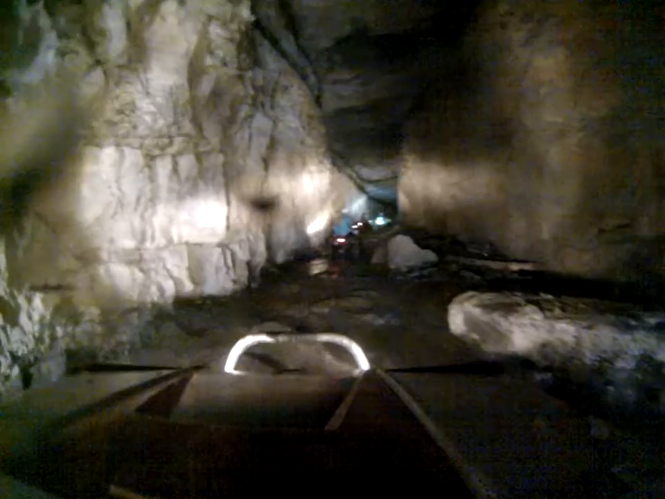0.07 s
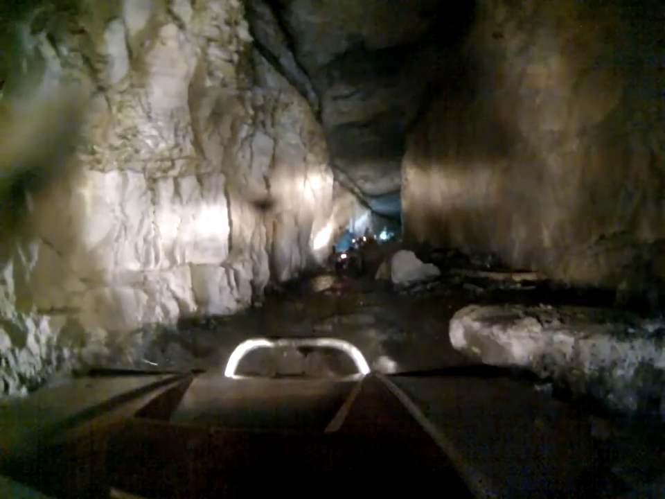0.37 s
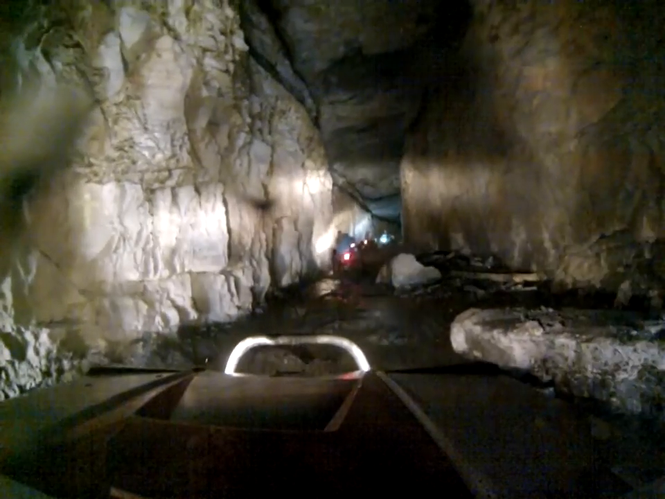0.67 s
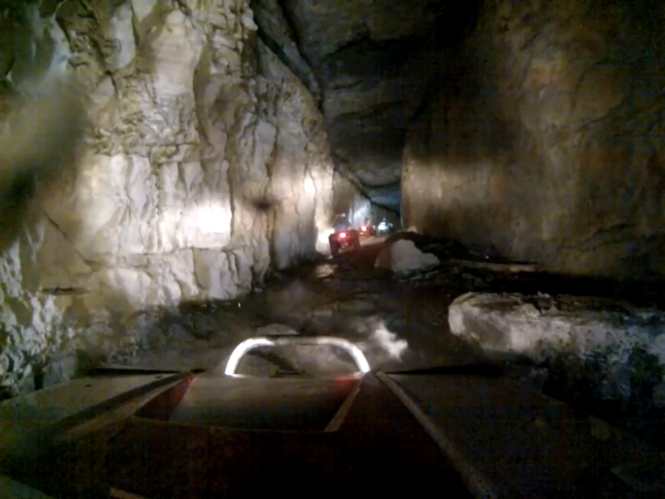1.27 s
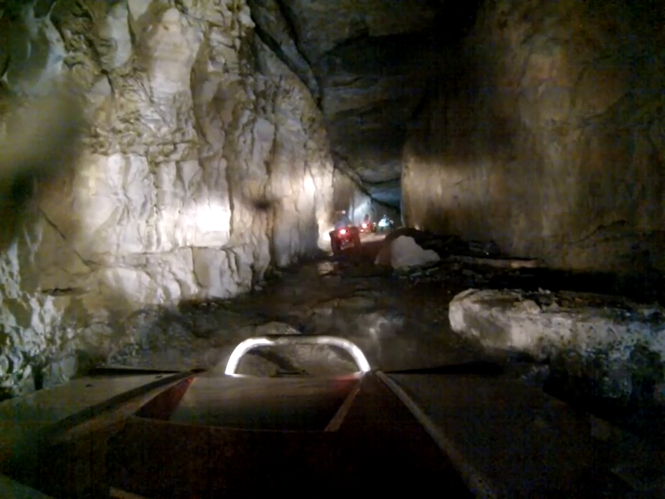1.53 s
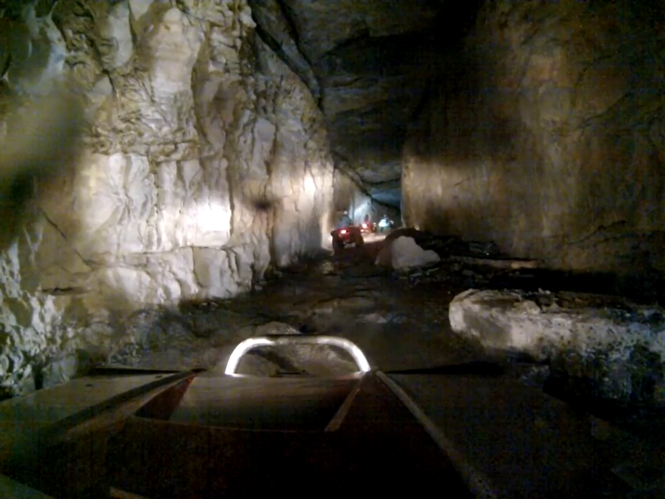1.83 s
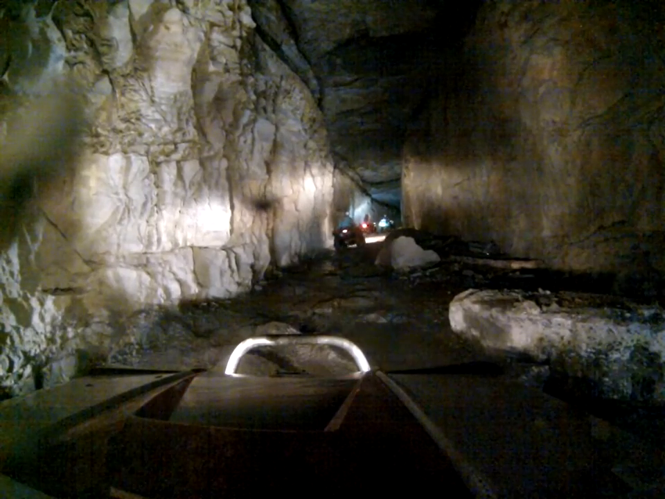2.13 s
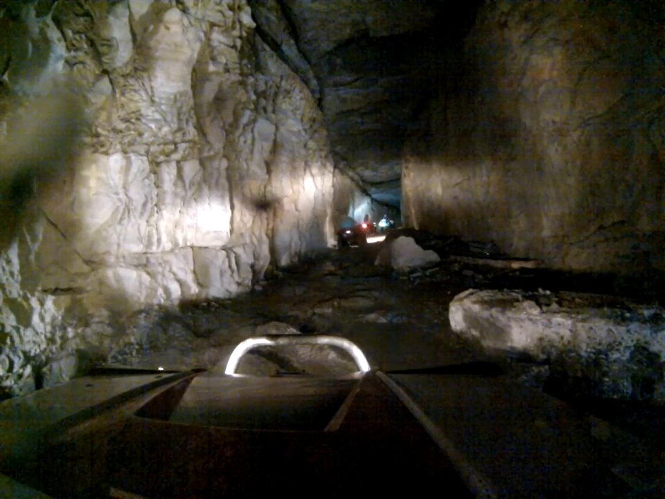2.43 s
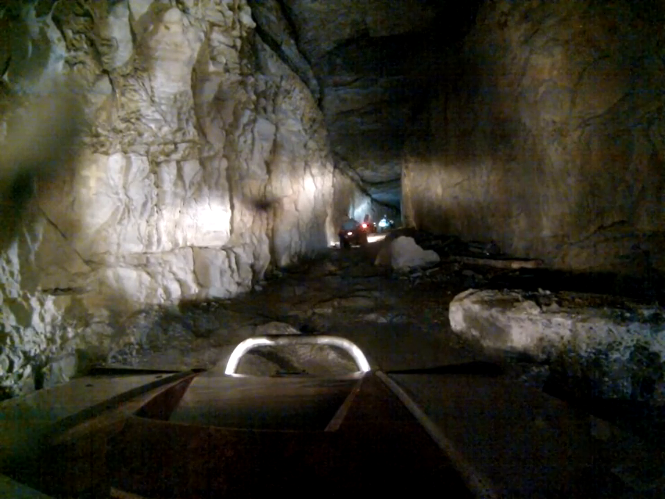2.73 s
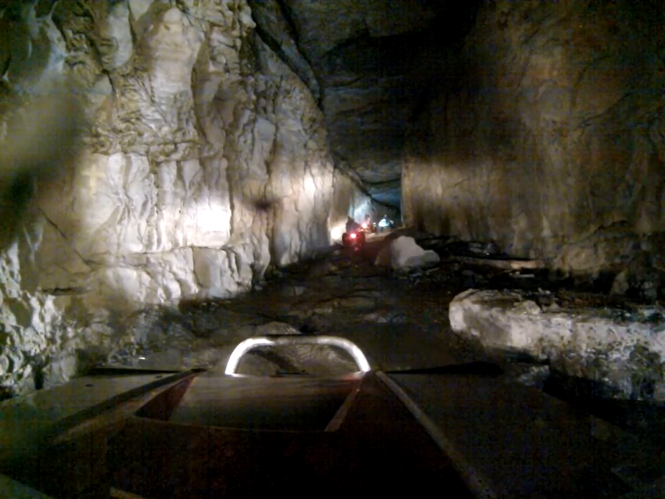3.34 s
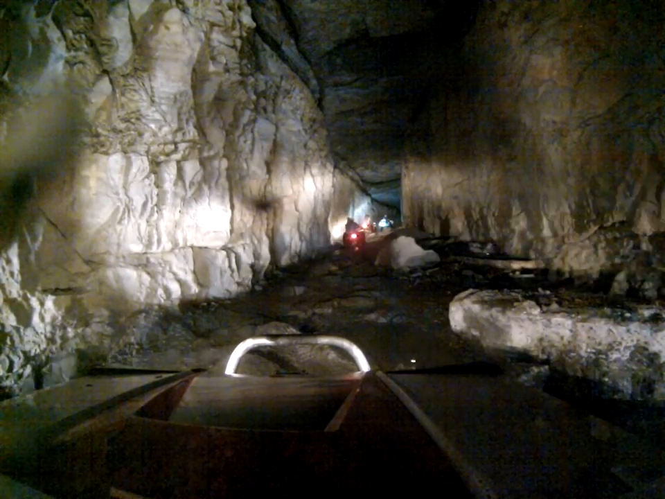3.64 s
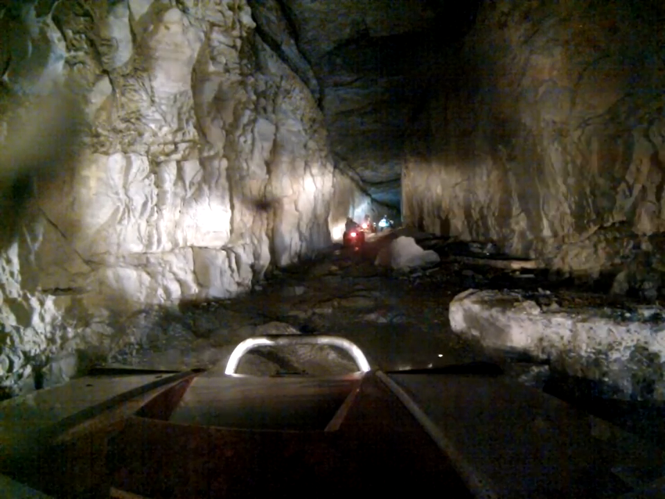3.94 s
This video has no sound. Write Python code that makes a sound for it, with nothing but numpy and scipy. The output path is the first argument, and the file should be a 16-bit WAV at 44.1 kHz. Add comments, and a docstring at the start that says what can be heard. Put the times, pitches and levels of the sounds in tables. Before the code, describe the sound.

An off-road buggy's engine rumbles low, with a few sharp knocks at the start.

```python
"""A four-cylinder engine, heard on board an off-road buggy crawling through a rock passage.
Its periodic firings drone, rev up unevenly and settle to a low rumble, forcing body and chassis to vibrate.
Five bumps knock the camera in its plastic housing, exciting damped modes; the hardest overload the
microphone. Hard firings and a few small jolts give low thuds with faint ticks. Behind them lies the noise
of fan, belt and wet tyres, with grit, one slosh of water and the knocks' faint reverberation in the rock."""
import sys
import numpy as np
from scipy import signal
from scipy.fft import rfft, irfft, next_fast_len
from scipy.io import wavfile
from scipy.ndimage import map_coordinates

SR = 44100
rng = np.random.default_rng(int(sys.argv[2]) if len(sys.argv) > 2 else 0)


def unload_wav(signal):
    """Save mono or channel-first audio to the path in sys.argv[1] as 16-bit WAV at rate SR, clipped to [-1, 1]."""
    wavfile.write(
        sys.argv[1],
        SR,
        np.round(np.clip(np.atleast_2d(signal).T, -1, 1) * 32767).astype(np.int16),
    )


N = 176400


# Engine speed (time [s], four-stroke cycle rate [Hz])
CYCLE_RATE = [(0, 17.5), (.12, 23), (.19, 19.3), (.27, 20.9), (.36, 21.7), (.46, 21), (.56, 21.2),
              (.68, 19.5), (.8, 22.7), (.88, 27.1), (1.08, 27.6), (1.33, 23.9), (1.5, 25.3), (1.7, 22.8),
              (2, 22.4), (2.35, 21.06), (2.7, 21.2), (3, 21.9), (3.3, 20.34), (3.65, 20.9), (4, 21.8)]
def engine_cycles(jitter=0.008):
    """Phase is the integral of frequency: the unsteady engine speed sums to a count of cycles."""
    return np.cumsum(curve(CYCLE_RATE) * (1 + jitter * wobble(20))) / SR


# Engine load (time [s], level [dB])
LOAD = [(0, -1), (.2, -15.5), (.42, -8.5), (.55, -3.5), (.8, -16.5), (.92, -4.5), (1.2, -3), (1.34, -5.5),
        (1.45, -2.5), (2.5, -4.5), (3.1, -3), (4, -4)]
# Firing fundamental (time [s], level [dB])
FIRING_LEVEL = [(0, -25.5), (.09, -29.5), (.17, -17), (.42, -15.5), (.55, -14), (.66, -21), (.84, -30),
                (1.2, -38), (1.35, -24.5), (1.48, -23), (1.66, -22), (1.76, -15), (1.85, -18), (1.895, -28),
                (1.96, -17), (2.1, -17), (2.38, -17.5), (2.55, -27.5), (2.68, -14), (2.88, -20),
                (3.12, -19), (3.22, -25.5), (3.33, -15.5), (3.44, -25), (3.62, -16.5), (4, -27)]
# Overtones (multiple of the firing rate [1], relative level [dB])
OVERTONES = [(2, -19), (3, -22.5), (4, -33), (5, -37)]
# Overtones are clear while the engine coasts, faint once it pulls (time [s], gain [dB])
OVERTONE_GAIN = [(0, -6), (.2, -1), (.48, -1), (.6, -13), (4, -10)]
def firing_note(cycles, load):
    """Periodic excitation: four firings a cycle give a harmonic series, which load makes rough."""
    overtones = sum(amp(db) * harmonic(cycles, 4 * k) for k, db in OVERTONES)
    level = amp(curve(FIRING_LEVEL) + 2 * load * wobble(22))
    return level * (harmonic(cycles, 4) + amp(curve(OVERTONE_GAIN)) * overtones)


# Shake at crank speed (time [s], level [dB])
SHAKE_LEVEL = [(0, -63.5), (.6, -39), (.8, -32), (.91, -17), (1, -24), (1.08, -13.5), (1.22, -17),
               (1.35, -21.5), (1.47, -32), (1.59, -20), (1.7, -27), (2.4, -34.5), (2.9, -29.5), (4, -28.5)]
def crank_shake(cycles):
    """Forced vibration at the rotation rate of the crank, two turns a cycle."""
    return amp(curve(SHAKE_LEVEL) + 2.5 * wobble(16)) * harmonic(cycles, 2)


# Weaker engine orders (multiple of the cycle rate [1], level at the source [dB])
ORDERS = [(1, -33), (3, -30), (5, -33.5), (6, -42), (7, -40), (8, -40), (9, -38), (10, -41.5), (11, -38),
          (12, -44.5)]
# Transmission to the seats (frequency [Hz], gain [dB])
CABIN_RESPONSE = [(250, 2), (268, -5), (290, -23.5), (400, -37.5)]
def weak_orders(cycles, load):
    """Low-pass transmission: of the wavering engine orders, mainly the lower ones reach the seats."""
    orders = sum(amp(db + 3.5 * wobble(9)) * harmonic(cycles, k) for k, db in ORDERS)
    return load * colour(orders, CABIN_RESPONSE)


# Response of the body panels (frequency [Hz], relative level [dB])
BODY_RESPONSE = [(70, -25.5), (112, -5.5), (135, -11), (200, -12), (232, -8.5), (258, -9.5), (290, -24.5),
                 (345, -23), (400, -32), (520, -42), (1100, -120)]
def body_drum(cycles, load, level_db=-30.5, scatter=2.3):
    """Impulse excitation: firings of uneven strength drum on the resonant body panels."""
    firings = np.diff(np.floor(4 * cycles), prepend=0)
    impulses = firings * (1 + scatter * rng.standard_normal(N))
    return load * amp(level_db) * unit(colour(impulses, BODY_RESPONSE))


def panel_boom(pitch_hz=244, drift_hz=4.95, level_db=-25.5):
    """Resonance: one panel booms briefly in a narrow band."""
    phase = 2 * np.pi * np.cumsum(pitch_hz + drift_hz * wobble(30.1)) / SR
    return amp(level_db) * bell(np.arange(N) / SR, centre=1.34, width=0.045) * np.sqrt(2) * np.sin(phase)


# Chassis rumble (frequency [Hz], relative level [dB])
RUMBLE_SPECTRUM = [(8, -47), (18, 3.5), (55, -6.5), (100, 25.5), (125, -18), (200, -47), (400, -120)]
# Chassis judder (time [s], level [dB])
JUDDER_LEVEL = [(0, -44.5), (.75, -45.5), (.92, -30), (1.06, -15.5), (1.2, -32), (1.35, -23), (1.5, -39),
                (1.62, -29.5), (1.8, -40.5), (4, -42)]
# Chassis judder (frequency [Hz], relative level [dB])
JUDDER_SPECTRUM = [(15, -26.5), (32, 10.5), (45, 3), (57, 15), (68, 14), (82, 13), (105, 6), (140, -40.5),
                   (300, -120)]
def chassis(load, rumble_db=-26.5):
    """Random vibration: the frame rumbles under load and judders over rough ground."""
    rumble = load * amp(rumble_db) * noise(RUMBLE_SPECTRUM)
    judder = amp(curve(JUDDER_LEVEL)) * noise(JUDDER_SPECTRUM)
    return rumble + judder


# Bumps (time [s], thump [dB], ring [dB], crack [dB], mount [dB], ring decay time factor [1])
KNOCKS = [(.0357, -1, -7, -6.5, -36.5, 1.02), (.098, -7.5, -17.5, -25, -36.5, 1.08),
          (0.184, -4, -11.5, -19, -35, 0.88), (0.4675, -12, -18.5, -25, -25.5, 1.45),
          (0.7176, -4, -3.5, -7, -23.5, 0.9)]
# Housing modes (frequency [Hz], relative level [dB], nominal T60 [s])
HOUSING_MODES = [(228.7, -6, 0.075), (316, -5, 0.039), (399, -7.5, 0.045), (850, -14.5, .03),
                 (1052, -9, 0.033), (1268, -7, 0.033), (1385, -11, 0.034), (1650, -3.5, 0.024),
                 (2085, -3.5, 0.022), (2190, -5, 0.012), (2510, -20, 0.054), (3280, -34, 0.068),
                 (3980, -24.5, 0.04)]
# Crack of contact (frequency [Hz], relative level [dB])
CRACK_SPECTRUM = [(300, -2), (1500, 1.5), (2500, 8), (3300, -11), (6500, -10), (8500, -31.5), (12000, -33),
                  (16000, -45)]
def knocks(mount_hz=589, rattle_delay_s=0.0075, rattle_db=-23.5):
    """Impact excites damped modes: the camera hits its housing with a thump, a ring and a crack."""
    out, t = np.zeros(N), np.arange(SR // 5) / SR
    push = bell(t, centre=0.0012, width=0.001)
    rebound = 0.57 * bell(t, centre=0.0089, width=0.0024)
    mount = np.sin(2 * np.pi * mount_hz * t) * decay(t, t60=0.06)
    rise = 1 - np.exp(-t / 0.00019)
    for s, thump_db, ring_db, crack_db, mount_db, stretch in KNOCKS:
        ring = sum(amp(db + rng.normal(0, 0.81)) * decay(t, t60 * stretch)
                   * np.sin(2 * np.pi * (hz * t + rng.random())) for hz, db, t60 in HOUSING_MODES)
        thump = amp(thump_db) * (rebound - push)
        crack = amp(crack_db) * burst(t, CRACK_SPECTRUM)
        add(out, s, rise * (thump + amp(ring_db) * ring + crack + amp(mount_db) * mount))
        rattle = amp(crack_db + rattle_db) * burst(t, TICK_SPECTRUM)  # the housing closes again
        add(out, s + rattle_delay_s, rise * rattle)
    return out


# Hard firings of the labouring engine and a few small jolts (time [s], tick [dB], thud [dB])
THUDS = [(.541, -41, -20), (.554, -43, -30), (1.058, -50, -15), (1.094, -38, -11), (1.152, -41, -12),
         (1.367, -29, -10), (1.577, -50, -15), (1.618, -42, -13), (2.009, -45, -20), (3.008, -43, -17)]
# Ticks, rattle and grit (frequency [Hz], relative level [dB])
TICK_SPECTRUM = [(300, 13), (900, 8.5), (2000, -10), (3500, 3.5), (6000, -9), (10000, -11), (14500, -16.5),
                 (16000, -37)]
def thuds(width_s=0.0056):
    """Transient response: each hard firing or small jolt gives a low thud with a faint tick."""
    out, t = np.zeros(N), np.arange(SR // 20) / SR
    middle = t.mean()
    thud = bell(t, middle, width_s) * (1 - 2 * ((t - middle) / width_s) ** 2)
    rise = 1 - np.exp(-t / 0.00025)
    for s, tick_db, thud_db in THUDS:
        add(out, s, amp(tick_db) * rise * burst(t, TICK_SPECTRUM))
        add(out, s - middle, amp(thud_db) * thud)
    return out


# Midrange rush (time [s], relative level [dB])
RUSH_LEVEL = [(0, -58.5), (.15, -56.5), (.35, -55.5), (.51, -47.5), (.62, -55.5), (.72, -53.5), (.8, -60),
              (.92, -50.5), (1.06, -48.5), (1.19, -54.5), (1.33, -49), (1.43, -49.5), (1.62, -47),
              (1.89, -50.5), (2.09, -49.5), (2.9, -49.5), (4, -49)]
# Midrange rush (frequency [Hz], relative level [dB])
RUSH_SPECTRUM = [(250, -24.5), (400, 0), (500, -3.5), (650, 1), (780, -6.5), (900, -9.5), (1080, -3.5),
                 (1280, -4), (1530, -0.5), (1650, -3), (1830, -13.5), (2080, -3.5), (2220, -2),
                 (2450, -8.5), (2800, -24.5), (4000, -57), (8000, -95)]
# Treble hiss (time [s], relative level [dB])
HISS_LEVEL = [(0, -63), (.12, -63.5), (.52, -57), (.66, -62), (.79, -64.5), (.95, -54), (1.06, -53.5),
              (1.17, -60), (1.32, -51.5), (1.41, -56), (1.53, -53), (2.1, -54.5), (3, -54.5), (4, -54)]
# Treble hiss (frequency [Hz], relative level [dB])
HISS_SPECTRUM = [(1500, -8), (2800, -4.5), (3350, -2), (3800, -5.5), (4170, -4), (4700, -11), (5070, -5.5),
                 (5650, -12), (6000, -8.5), (6600, -10.5), (7500, -15.5), (7950, -13.5), (9000, -21.5),
                 (11300, -21), (14000, -27.5), (15100, -33), (15700, -55.5)]
def rush(cycles, depth=0.074):
    """Amplitude modulation: the noise of fan, belt and wet tyres pulses a little with the crank."""
    pulse = 1 + depth * np.sin(2 * np.pi * 2 * cycles)
    midrange = amp(curve(RUSH_LEVEL) + 0.5 + 1.1 * wobble(24.783)) * noise(RUSH_SPECTRUM)
    hiss = amp(curve(HISS_LEVEL) - 2.5 + 0.73 * wobble(80)) * noise(HISS_SPECTRUM)
    return pulse * (midrange + hiss)


def grit(specks_per_s=37, spread_db=1.5, gain_db=-9.5):
    """Shot noise: specks of grit click at random under the tyres, following the level of the hiss."""
    specks = (rng.random(N) < specks_per_s / SR) * amp(spread_db * rng.standard_normal(N))
    t = np.arange(SR // 100) / SR
    click = rng.standard_normal(len(t)) * decay(t, t60=0.0047)
    clicks = signal.fftconvolve(specks, click)[:N]
    return amp(curve(HISS_LEVEL) + gain_db) * unit(colour(clicks, TICK_SPECTRUM))


# Sloshing water (frequency [Hz], relative level [dB])
SLOSH_SPECTRUM = [(250, -15), (390, 7), (500, -9.5), (780, 4), (1300, -34.5), (4000, -90)]
def puddle(level_db=-48):
    """Band-limited noise swells and fades once as water sloshes round the wheels."""
    return amp(level_db) * bell(np.arange(N) / SR, centre=0.51, width=0.19) * noise(SLOSH_SPECTRUM)


def rock_walls(sound, level_db=-31.5):
    """Reverberation: dense reflections from the rock merge into a dull, exponentially decaying tail."""
    t = np.arange(SR) / SR
    tail = colour(rng.standard_normal(SR), [(200, 14), (2000, -20), (8000, -27)]) * decay(t, t60=0.69)
    return amp(level_db) * signal.fftconvolve(sound, tail / np.linalg.norm(tail))[:N]


def amp(db):
    """Decibels to amplitude ratio."""
    return 10 ** (np.asarray(db) / 20)


def unit(x):
    """Normalisation to rms 1."""
    return x / np.sqrt(np.mean(x ** 2) + 1e-20)


def curve(rows):
    """Linear interpolation of (time [s], value) rows at every sample."""
    return np.interp(np.arange(N) / SR, *np.transpose(rows))


def wobble(rate):
    """Smooth random modulation, rate knots a second."""
    return map_coordinates(rng.standard_normal(1000), [np.arange(N) * rate / SR + 2], mode="wrap")


def bell(t, centre, width):
    """Gaussian pulse of height 1; centre and width in seconds."""
    return np.exp(-((t - centre) / width) ** 2)


def decay(t, t60):
    """Exponential decay by 60 dB in t60 seconds."""
    return amp(-60 * t / t60)


def harmonic(cycles, order):
    """Sinusoid of rms 1 and random phase at a whole multiple of the cycle rate."""
    return np.sqrt(2) * np.sin(2 * np.pi * (round(order) * cycles + rng.random()))


def colour(x, points):
    """Minimum-phase filter through (frequency [Hz], gain [dB]) points."""
    size = 2 * next_fast_len(len(x))
    hz, db = np.transpose(points)
    gain = amp(np.interp(np.log(np.fft.rfftfreq(size, 1 / SR) + 1), np.log(hz + 1), db))
    cepstrum = irfft(np.log(np.maximum(gain, 1e-6)), size)
    cepstrum[1:size // 2] *= 2  # folding onto positive time makes the filter causal
    cepstrum[size // 2 + 1:] = 0
    return irfft(rfft(x, size) * np.exp(rfft(cepstrum)), size)[:len(x)]


def noise(spectrum):
    """Stationary coloured noise of rms 1."""
    return unit(colour(rng.standard_normal(N + SR // 2), spectrum)[-N:])


def burst(t, spectrum, t60=0.018):
    """Exponentially damped coloured noise."""
    return unit(colour(rng.standard_normal(len(t)), spectrum)) * decay(t, t60)


def add(track, s, sound):
    """Superpose a sound on the track at s seconds."""
    part = track[max(0, round(s * SR)):][:len(sound)]
    part += sound[:len(part)]


def scene():
    """Superposition: engine and rush follow one shaft; the knocks are close and nearly dry."""
    cycles, load = engine_cycles(), amp(curve(LOAD))
    hits = knocks()
    engine = firing_note(cycles, load) + crank_shake(cycles) + weak_orders(cycles, load)
    structure = body_drum(cycles, load) + panel_boom() + chassis(load)
    background = rush(cycles) + grit() + puddle()
    return (engine + structure + hits + thuds() + background + rock_walls(hits))[None]


def record(dry, full_scale=1.0, cutoff_hz=15800):
    """Saturation and band limiting: the camera flattens the highest peaks, then cuts the top treble."""
    size = next_fast_len(N + SR // 2)
    saturated = np.clip(dry, -full_scale, full_scale)
    passband = np.fft.rfftfreq(size, 1 / SR) < cutoff_hz
    return irfft(rfft(saturated, size) * passband, size)[..., :N]


dry = scene()
out = record(dry)
unload_wav(out)
```